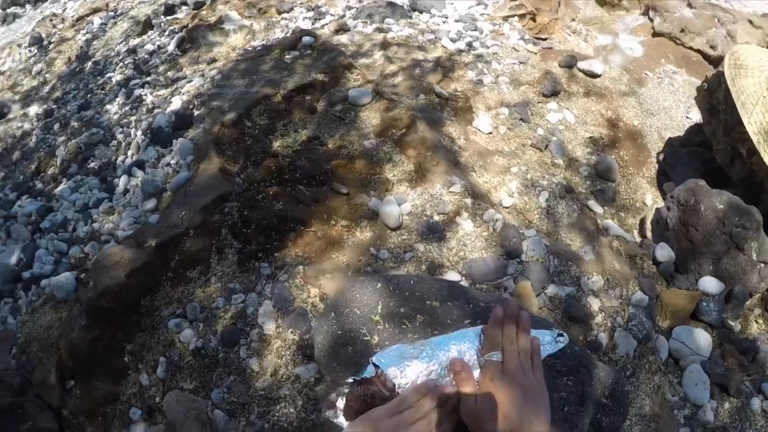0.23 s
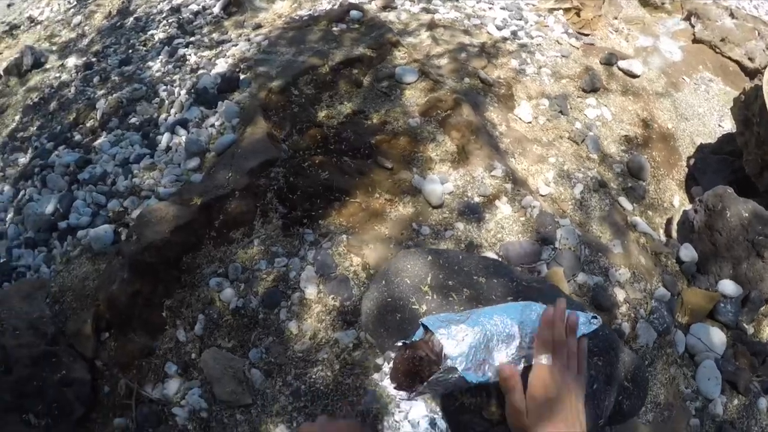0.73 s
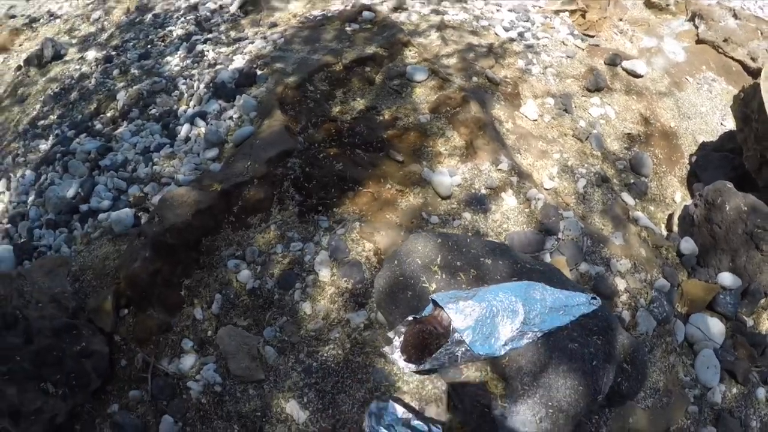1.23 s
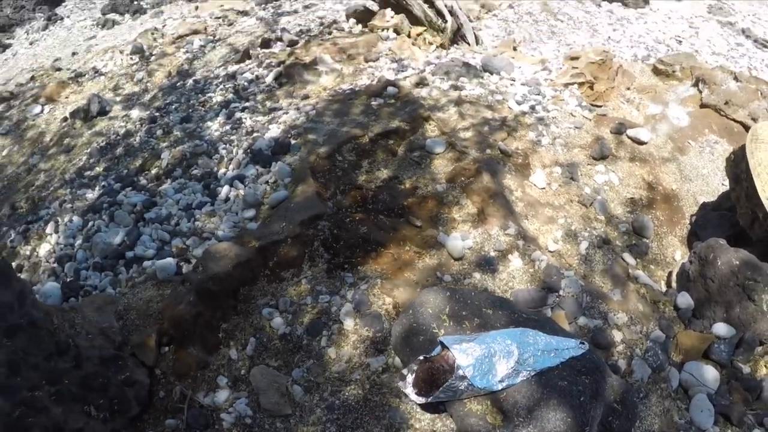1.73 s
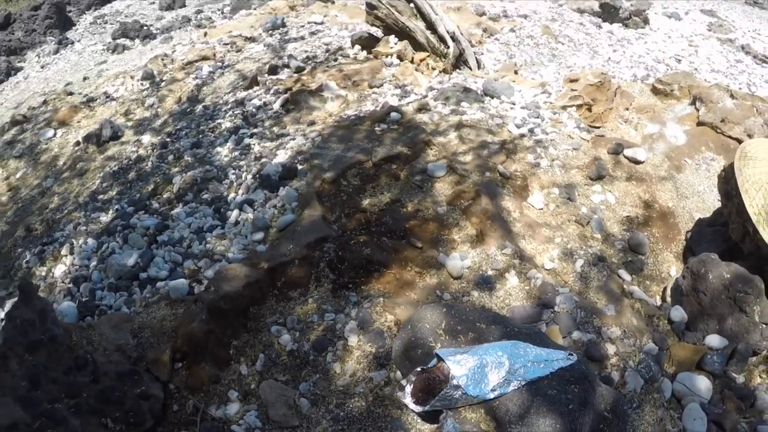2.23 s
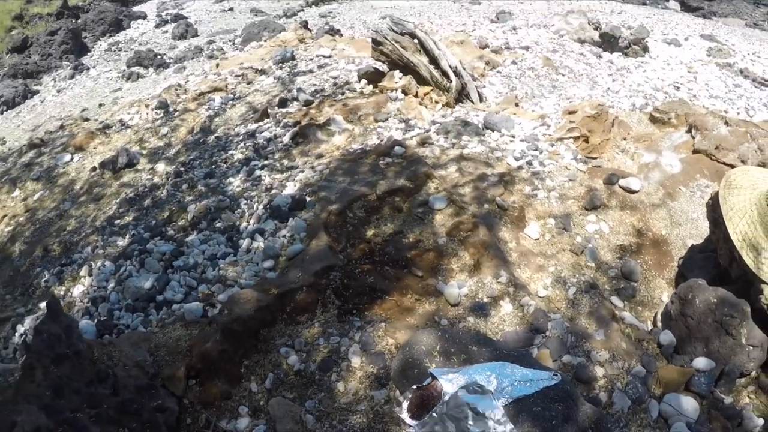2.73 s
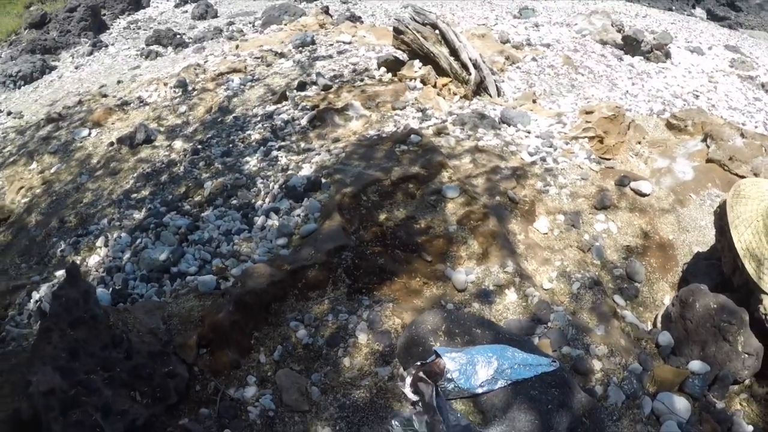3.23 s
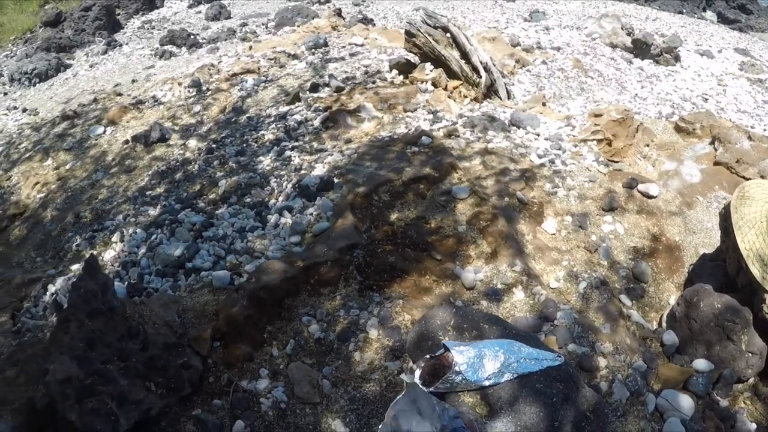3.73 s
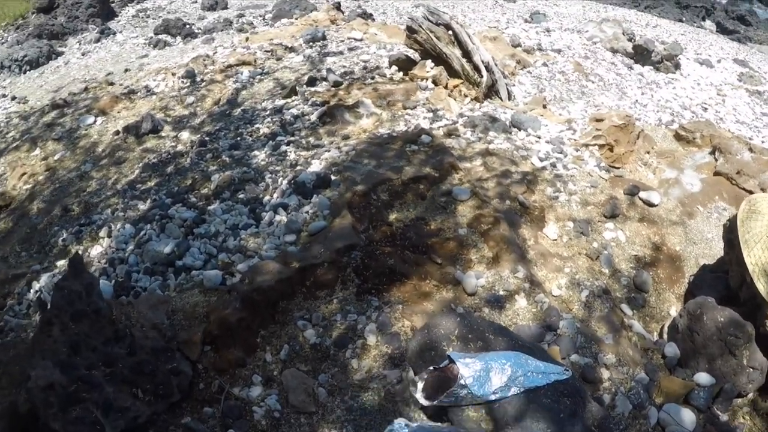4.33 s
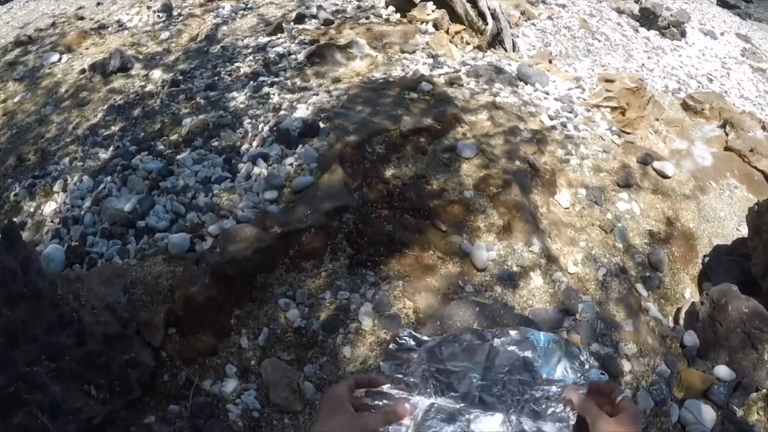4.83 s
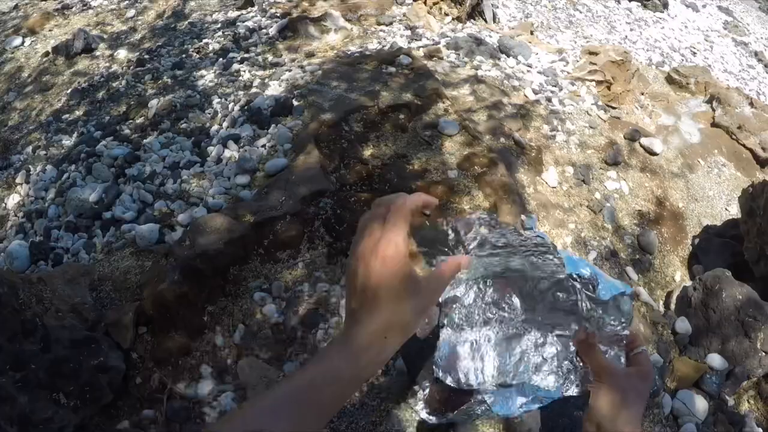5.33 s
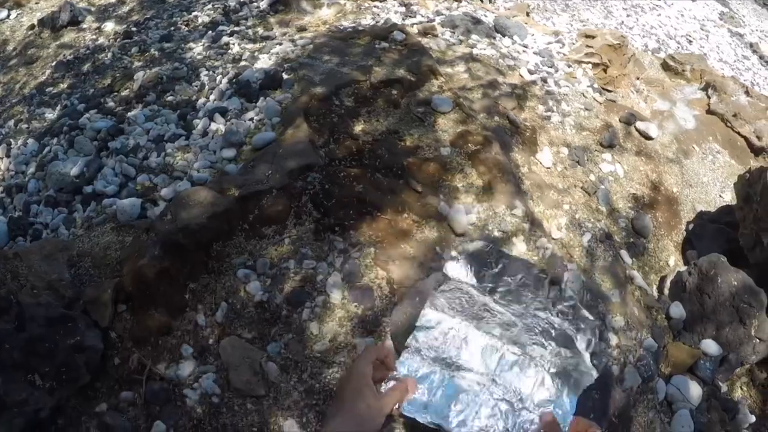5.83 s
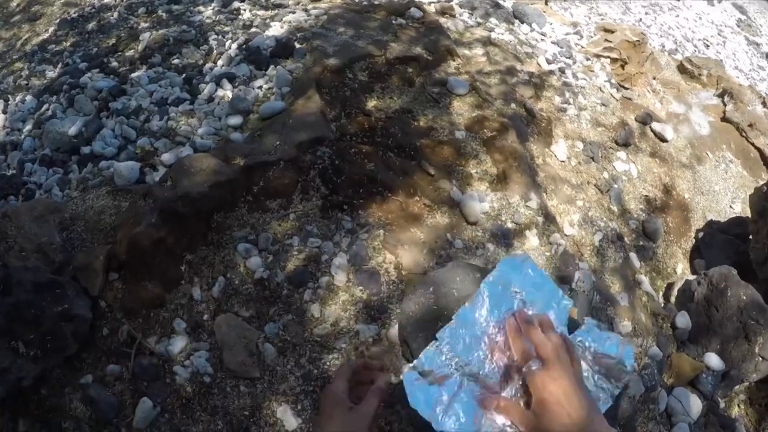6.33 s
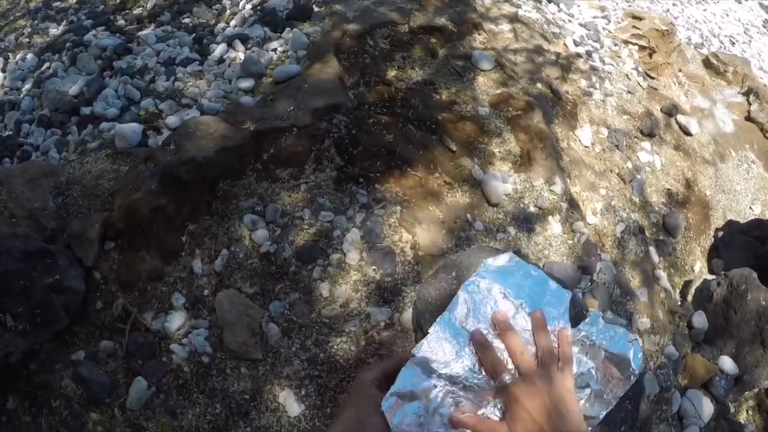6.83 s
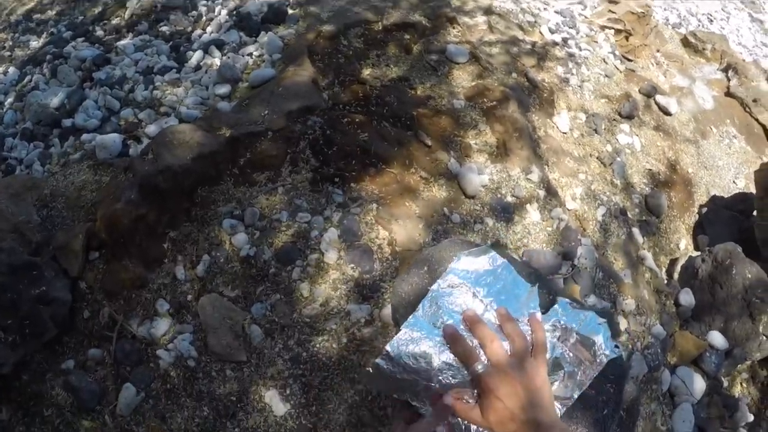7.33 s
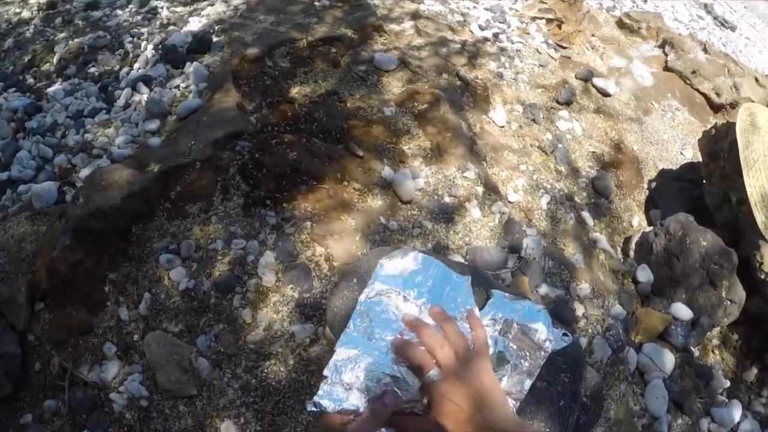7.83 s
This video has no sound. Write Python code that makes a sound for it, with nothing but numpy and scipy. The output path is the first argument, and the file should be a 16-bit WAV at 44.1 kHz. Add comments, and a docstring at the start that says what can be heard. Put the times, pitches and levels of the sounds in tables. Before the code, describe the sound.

Hands crinkle crisp foil outdoors by the shore, sharp crackles over soft water hiss and wind puffs, then a loud knock and small tick.

```python
"""Thin foil rustles, crackles and snaps close by, with one hard knock and then a bright tick to the left.
Place: a stony shore. Far sea hiss is coloured noise; wind is gusty noise and blunt pushes on two ports.
Near the microphones, hands fold and press the foil: random facets pop and ring, clustered around creases.
The microphone is a small camera's pair of ports, whose housing colours each side differently."""
import sys
import numpy as np
from scipy import signal
from scipy.fft import rfft, irfft, next_fast_len
from scipy.io import wavfile

SR = 44100
rng = np.random.default_rng(int(sys.argv[2]) if len(sys.argv) > 2 else 0)


def digitize_waveform(pressure):
    """Quantize a signal to 16-bit integers and store it at the path in sys.argv[1].

    Rows of a 2-D input are taken as channels; values are limited to [-1, 1].
    """
    field = np.atleast_2d(pressure).T
    bounded = np.clip(field, -1, 1)
    quanta = np.round(bounded * 32767).astype(np.int16)
    wavfile.write(sys.argv[1], SR, quanta)


N = 356019   # samples

# Table levels are each layer's own drive, ahead of its trims, the ports and the output stage.
# Far water: (time [s], hiss level [dB])
SEA = [(0.0, -47), (0.87, -44.5), (2.0, -45), (2.62, -47.5), (2.99, -46), (3.23, -47.5), (4.16, -44),
       (4.56, -41.5), (5.08, -46.5), (5.64, -44), (5.8, -41.5), (6.18, -46), (6.85, -41.5), (7.17, -43.5),
       (7.3, -42.5), (7.75, -45), (7.87, -44), (8.07, -45)]
# Hiss spectrum: (frequency [Hz], relative density [dB per Hz])
SEA_COLOUR = [(150, 22), (500, 10), (1500, 9), (2000, 5), (2600, 5), (3600, 0), (4800, -5.5), (6500, -4),
              (12000, -5.5)]
# Deep rumble: (time [s], level [dB])
RUMBLE = [(0, -75), (1.3, -72), (3.5, -77), (4.2, -71), (7.0, -71), (7.6, -68), (7.76, -52), (7.95, -49),
          (8.07, -40)]
# Light air on the camera: (time [s], buffeting level [dB])
WIND = [(0, -58), (1.3, -56), (2.5, -49.5), (3.9, -50.5), (4.5, -55), (5.4, -52), (6.3, -47), (6.7, -48),
        (7.3, -45), (7.74, -45), (7.95, -38.5), (8.07, -39)]
# Buffeting spectrum: (frequency [Hz], relative density [dB per Hz])
WIND_COLOUR = [(160, 1.5), (210, -4.5), (350, -11.5), (600, -42), (1200, -29), (4000, -79)]
# Gusts at the ports: (time [s], peak level [dB], half-length of window [s], left minus right [dB])
GUSTS = [(.01, -41, 0.079, 0), (1.236, -48, 0.2, 14), (1.48, -39, 0.11, 14), (1.672, -42.5, 0.31, 17),
         (1.783, -51, 0.1, 12), (1.918, -45, 0.072, 7), (2.54, -38, 0.061, 5), (2.918, -51, .15, 2),
         (3.112, -48.5, 0.14, 17), (4.14, -45, 0.13, 18), (4.255, -43, 0.093, 0), (4.613, -36.5, 0.18, -3),
         (5, -47, 0.11, 12), (5.226, -39.5, 0.16, 4), (5.667, -40.5, 0.059, 10), (5.882, -43, 0.11, 17),
         (5.979, -41, 0.043, 23), (6.058, -35, 0.068, 12), (6.24, -42, 0.13, 2), (6.349, -34, 0.036, 8),
         (6.771, -35, 0.059, 9), (6.933, -37.5, 0.23, 12.5), (7.22, -42, 0.23, 13), (7.302, -41, 0.21, 11),
         (7.491, -39.5, 0.16, 28), (7.547, -28, 0.049, 17), (7.588, -25.5, 0.053, 16),
         (7.636, -29.5, 0.13, 9)]
# Puffs pushing mostly on the left port: (time [s], peak level [dB], width [s], left minus right [dB])
THUMPS = [(1.5074, -20, 0.00096, 16), (1.675, -32, .0012, 16), (4.1585, -13, 0.00099, 14),
          (5.9767, -29, 0.00062, 18), (6.0668, -18, 0.0014, 18), (6.36, -16, 0.0011, 19),
          (6.7804, -18, 0.0022, 16), (6.892, -30, .0007, 8), (6.9383, -22, 0.00051, 10),
          (7.218, -34, .0012, 16), (7.2823, -15, 0.00089, 17), (7.359, -28, .0008, 9),
          (7.393, -19, .0012, 14), (7.4935, -19, .001, 16), (7.5316, -17, 0.0017, 17),
          (7.542, -5.5, 0.00097, 16), (7.5763, -15, 0.00046, 14), (7.5795, -4, 0.0018, 16),
          (7.601, -18, .0009, 14)]
# Modes the knock rings: (frequency [Hz], level [dB], decay by 60 dB [s], left minus right [dB])
KNOCK_MODES = [(190, -4.5, 0.013, -1), (400, -1, 0.0051, 13), (1110, -8, 0.0076, 18),
               (1850, 0.5, 0.0033, 13), (3250, -7.5, 0.0073, 14), (3770, -5, 0.0039, 4),
               (5350, -22, 0.0036, -9), (6900, -29, 0.004, 5), (8600, -23, 0.0078, -2)]
# Handling of the sheet: (time [s], crackle level [dB], dull flexing relative to crackle [dB])
HANDLING = [(0, -52.5, 3.5), (.6, -48, 1), (.72, -50, -2), (.97, -49.5, 6), (1.04, -42, -1.5),
            (1.13, -44.5, -1.5), (1.3, -41.5, -6.5), (1.58, -55, 7.5), (1.98, -42, -12), (2.05, -59, 4.5),
            (2.4, -48.5, 1), (2.65, -52, 6), (2.95, -47.5, -1), (3.37, -58.5, 11), (3.6, -46, 1),
            (4.0, -57, 10.5), (4.64, -54, 6), (4.69, -40, -3.5), (4.75, -50, 5), (5.3, -43, -2.5),
            (5.6, -59.5, 7.5), (5.86, -55, 5), (5.95, -38, -10), (6.0, -54.5, 2.5), (6.33, -49, 3),
            (6.39, -38.5, -5.5), (6.56, -49, 0), (6.71, -37, -25), (6.93, -38, 4.5), (7.04, -44.5, -17),
            (7.16, -37.5, -5), (7.23, -49.5, -1), (7.28, -54, 3), (7.35, -50.5, 14), (7.4, -46, 2),
            (7.66, -47, -2), (7.73, -54, -5), (7.8, -41, -24), (7.92, -47.5, 8), (8.02, -53, -3),
            (8.07, -41, 0)]
# Facet pitches: (frequency [Hz], relative level [dB])
FOIL_COLOUR = [(400, -9), (1000, 0.5), (2500, 3.5), (5000, 2), (8000, 4), (14000, 15.5)]
# Larger panels that buckle: (time [s], peak level [dB], ringing frequency [Hz])
CRUMPLES = [(0.1, -27, 1230), (0.3, -30.5, 1370), (0.387, -27, 940), (0.626, -28, 850), (1.018, -28, 448),
            (1.456, -33, 1680), (1.462, -26, 1670), (2.197, -27, 670), (2.283, -25.5, 740),
            (2.358, -36, 2030), (2.756, -38, 2020), (2.771, -31, 1950), (2.844, -31, 1150),
            (2.871, -31, 1910), (2.874, -34, 810), (2.933, -32, 1200), (2.952, -32, 1900),
            (3.52, -33, 1190), (4.335, -27, 719), (4.354, -30, 719), (4.54, -28, 1780), (4.752, -24, 1250),
            (5.271, -28, 1890), (5.662, -23, 760), (5.827, -24, 1900), (5.937, -26.5, 1500),
            (5.948, -19, 1140), (5.956, -20, 1820), (6.231, -38, 974), (6.854, -20, 877), (6.891, -18, 450),
            (7.1, -27, 485), (7.158, -21.5, 474), (7.187, -18.5, 1040), (7.27, -18.5, 608),
            (7.282, -21.5, 770), (7.31, -28, 1470), (7.339, -27, 1210), (7.346, -28, 805),
            (7.358, -23, 751), (7.408, -32, 1900), (7.438, -27, 764), (7.572, -19, 550), (7.767, -32, 934),
            (7.842, -37, 1840), (7.909, -35, 1070), (7.928, -24, 1090)]
# Single dry cracks: (time [s], peak level [dB], centre frequency [Hz])
CRACKS = [(0.1371, -25, 3010), (0.2481, -30, 6290), (0.398, -27, 5810), (0.4143, -27, 4780),
          (0.4267, -28, 5080), (0.4309, -30, 6240), (0.6296, -19, 6500), (0.6403, -25, 7840),
          (0.6671, -29, 7240), (1.1677, -29, 6630), (1.2611, -26, 6330), (1.3066, -25, 6160),
          (1.3388, -23, 6070), (1.3803, -25, 6630), (1.8403, -24, 6240), (1.8552, -23, 6160),
          (1.9318, -22, 6500), (1.9527, -26, 7450), (2.1163, -26, 6240), (2.2006, -17, 2970),
          (2.2059, -27, 2500), (2.3473, -28, 5990), (2.361, -27, 6720), (2.3837, -27, 6590),
          (2.4076, -30, 5860), (2.4278, -24, 6330), (2.4632, -28, 6590), (2.5321, -20, 6290),
          (2.7586, -21, 6330), (2.7961, -31, 6160), (2.873, -16, 4220), (2.8911, -24, 6030),
          (3.0396, -31, 5990), (3.1213, -25, 6160), (3.2347, -30, 7020), (3.261, -28, 6630),
          (3.4739, -27, 6290), (3.5181, -20, 5940), (3.5238, -24, 6890), (3.5454, -28, 6030),
          (3.66, -27, 7110), (3.77, -26, 6070), (4.0176, -20, 6500), (4.0671, -25, 5990),
          (4.0726, -24, 5900), (4.1001, -21, 5810), (4.149, -24, 6290), (4.1583, -22, 6030),
          (4.1674, -23, 5640), (4.2123, -27, 7540), (4.3554, -26, 2110), (4.5428, -19, 1850),
          (4.6801, -26, 6800), (4.9673, -24, 6630), (5.0252, -21, 5990), (5.0574, -19, 5560),
          (5.0613, -25, 5170), (5.1884, -23, 5340), (5.1987, -22, 5770), (5.2154, -24, 4870),
          (5.2555, -27, 1940), (5.2884, -24, 3660), (5.3095, -25, 5990), (5.3597, -27, 7110),
          (5.3764, -21, 6030), (5.6063, -31, 6630), (5.6375, -26, 5510), (5.6681, -17, 5640),
          (5.6737, -19, 6240), (5.7563, -27, 7110), (5.791, -23, 5990), (5.8052, -24, 5040),
          (5.8288, -22, 1810), (5.8466, -25, 5900), (5.945, -23, 6120), (6.231, -24, 6720),
          (6.2358, -25, 6160), (6.2465, -29, 6760), (6.3705, -22, 3490), (6.5495, -29, 6930),
          (6.6906, -25, 6850), (6.7891, -20, 6330), (6.8499, -23, 6500), (6.8673, -25, 6200),
          (6.9049, -18, 5380), (6.9171, -23, 5170), (6.9317, -22, 5860), (6.9684, -25, 6200),
          (7.022, -27, 6160), (7.0582, -24, 6630), (7.1041, -23, 5770), (7.1429, -20, 3920),
          (7.1595, -14, 5680), (7.1645, -25, 5430), (7.1887, -22, 1680), (7.1934, -22, 5340),
          (7.2315, -30, 6890), (7.2584, -22, 5600), (7.3405, -25, 7110), (7.4394, -25, 5080),
          (7.4469, -24, 7190), (7.5454, -26, 6460), (7.5774, -23, 5560), (7.6087, -26, 3190),
          (7.6175, -17, 2710), (7.768, -25, 5860), (7.8409, -23, 5770), (7.904, -21, 6500),
          (7.9107, -22, 6500)]
# Creases that snap: (time [s], peak level [dB], relative dull part [dB], ringing frequency [Hz],
# relative swell of rustle [dB])
SNAPS = [(0.1248, -27.5, -4.5, 5800, -10.5), (0.2382, -41, -15, 6300, -0.5),
         (0.397, -27.5, -9, 5640, -14.5), (0.5621, -25, -21, 6470, -22), (0.6262, -15, -14, 6700, -36),
         (0.632, -14.5, -10, 6700, -23), (0.786, -29, -13, 6470, -15), (1.046, -35, -20, 6300, -16),
         (1.105, -24.5, -20, 6070, -18), (1.257, -26.5, -0.5, 6300, -9.5), (1.3056, -28, -18, 6030, -26),
         (1.3367, -23, -11, 6000, -31), (1.378, -22, -32, 6700, -31), (1.659, -28, 2, 6200, -13),
         (1.742, -31, -3, 6590, -16), (1.8393, -18.5, -25, 6200, -34), (1.93, -24.5, -23, 6530, -14.5),
         (2.0024, -17.5, -10, 3900, -18), (2.1136, -28.5, -9, 6200, -11), (2.167, -30.5, -20, 6600, -7.5),
         (2.1998, -10, -17, 2580, -31), (2.2018, -18.5, -26, 6450, -30), (2.2855, -24, -12, 2860, -21),
         (2.346, -26.5, -3, 6960, -13.5), (2.383, -30, -20, 7050, -16), (2.427, -28.5, -27, 6340, -14.5),
         (2.5306, -17.5, -17, 6200, -21.5), (2.7558, -20, -19, 6330, -11), (2.763, -22, -16, 6700, -24),
         (2.7696, -22, -20, 3620, -26), (2.842, -23, -12, 3080, -22), (2.871, -20.5, -2, 4040, -17),
         (2.891, -24, -12, 6900, -20), (2.93, -28, -9, 6900, -21), (2.95, -27, -16, 4120, -12),
         (3.04, -29, -16, 6270, -14), (3.1194, -22, -29, 6450, -33), (3.231, -24.5, -14, 6300, -20),
         (3.2584, -23.5, -6, 6900, -22), (3.417, -28.5, -6, 6660, -9.5), (3.471, -32.5, -24, 5960, -7.5),
         (3.5176, -21.5, -10, 6300, -14), (3.657, -28, -12, 7040, -23), (3.7693, -29, -18, 6300, -29),
         (3.904, -31.5, -22, 3070, -9), (4.014, -15.5, -24, 6600, -34), (4.065, -22, -21, 5910, -34),
         (4.072, -27, -16, 5200, -31), (4.099, -20.5, -19, 5860, -20), (4.147, -22, -20, 6550, -19),
         (4.1533, -19, -20, 6000, -17), (4.165, -17, -26, 5700, -26), (4.214, -28.5, -10, 6050, -11),
         (4.354, -27.5, -5, 2360, -14), (4.465, -26.5, -22, 6400, -8.5), (4.5409, -13, -18, 3250, -24.5),
         (4.6794, -24, -17, 6840, -20), (4.966, -26, -11, 6100, -26), (5.023, -23, -15, 6000, -32),
         (5.0549, -16.5, -25, 5330, -19), (5.185, -26, -2, 5350, -29), (5.199, -23, -4, 6330, -14),
         (5.288, -21, -22, 3630, -13), (5.3743, -16, -30, 6200, -34), (5.6046, -29, -18, 3280, -18),
         (5.6366, -21, -8, 6360, -22), (5.6636, -14.5, -7, 2800, -33), (5.668, -13, -15, 5430, -20),
         (5.7547, -22, -22, 4700, -34), (5.79, -23.5, -19, 5840, -16), (5.8463, -29.5, -5, 4870, -7.5),
         (6.153, -23.5, -2.5, 3620, -18), (6.231, -24.5, -0.5, 6700, -13), (6.3694, -18, -18, 3670, -23),
         (6.715, -24, -10, 6300, -16), (6.745, -26, -16, 6450, -12), (6.768, -28.5, -9, 6650, -0.5),
         (6.7857, -31, -18, 6800, -21), (6.81, -45, -20, 6300, -27), (6.83, -38, -20, 6560, -26),
         (6.8544, -26, 2, 6900, -19), (6.9042, -22, -22, 5800, -21), (6.929, -23.5, -12, 6270, -13),
         (6.9654, -24, -17, 6130, -20), (7.0569, -30, -24, 6460, -15), (7.102, -23, -9, 5600, -18),
         (7.1447, -19.5, -13, 6040, -11.5), (7.157, -19, -25, 5770, -20), (7.187, -22, -8, 5400, -18),
         (7.256, -21, -25, 6000, -20), (7.285, -22.5, -11, 3680, -19), (7.3397, -19, -9, 2340, -29),
         (7.441, -22, -24, 5970, -19), (7.449, -22, -17, 6900, -25), (7.5438, -26, -7, 6340, -12),
         (7.5766, -22, -14, 6270, -19), (7.6163, -10.5, -20, 2620, -31), (7.685, -26, 4, 7150, -10),
         (7.7682, -17.5, -2.5, 5620, -25), (7.788, -23, -4, 3960, -10.5), (7.8385, -24.5, 4, 2430, -12.5),
         (7.8822, -20, -18, 6560, -22), (7.9017, -25, -20, 6690, -26), (7.9098, -16.5, -5.5, 6300, -36),
         (7.936, -28, -15, 6500, -11), (8.0414, -25, -16, 5770, -16)]
# Microphone ports: (frequency [Hz], left level [dB], right level [dB], nominal phase lead of right [rad],
# nominal likeness of the sides [0-1])
PORTS = [(443, -7.5, -11, 1.93, 0.14), (688, -3.5, -9.5, 3, 0.54), (1090, -7.5, -1.5, 2.5, 0.79),
         (1250, -8, -5.5, 1.26, 0.45), (1640, -15, -0.5, 5, 0.2), (1694, -6.5, -4.5, 0.04, 0.93),
         (1950, -4, -5, 1.13, 1), (2210, -10, -6, 1.5, 0.8), (3620, -5.5, -2, 0.59, 0.98),
         (4400, -2, -4.5, 0.5, 0.85), (5300, -3, 0.5, 1.83, 0.9), (5550, 3.5, -1.5, 0.95, 0.6),
         (6200, 4, 4, 1.0, 0.7), (7650, 1.5, 0, 0.5, 0.15), (8940, -11.5, -3.5, 7.5, 0),
         (10100, -11.5, -12.5, -8.5, 0.1), (10570, -24, -19, -5.5, 0.5), (13130, -17.5, -20, -2, 0.96),
         (15100, -48, -33, -43, .8)]

KNOCK_S, KNOCK_DB = 7.668, -0.5
TICK_S, TICK_DB, TICK_T60_S = 7.7879, -13.5, 0.0051
TICK_LEAD_S = .00007   # head start at the left port
DULL_BELOW_HZ = 2400   # facets above this count as bright
DULL_LAG = 0.69   # dB the dull flexing loses, relative to the crackle, per dB of swell
SWELL_RISE_S, SWELL_FALL_S = .002, 0.011   # rustle gathers before a snap and drops after it
BUILD_UP_S = 0.001012   # a panel starts this long before its reference time
CRUMPLE_T60_S = 0.077
CRUMPLE_OVERTONE, CRUMPLE_OVERTONE_DB = 1.62, -12.5   # second mode: multiple of the first, relative level
CRACK_CYCLES = 7.0   # cycles of the main pulse until 60 dB down
CRACK_LAG_S = .00002   # the left port hears a crack this much later
SNAP_T60_S, SNAP_T60_SPREAD = 0.027, 0.34   # median decay, spread of its natural log
BROAD_DB = -9   # bright facets joining each snap, relative to its envelope
NEAR_RATIO = 1.54   # band edges of the near pops, either side of the panel's pitch
# Lesser snaps: strongest peak over the crackle, middle dull part, base ringing frequency
SMALL_SNAP_DB, SMALL_DULL_DB, SMALL_HZ = 18, -29, 6300
SOFT_ABOVE_HZ = 9500   # contacts are not perfectly hard
WIND_CUT_HZ = 146.4
TOP_STOP_HZ = 16300   # from here up the top is fully cut


def from_db(db):
    """Decibels to amplitude gain."""
    return 10 ** (np.asarray(db) / 20)


def rms_one(x):
    """Scale to unit rms."""
    return x / np.sqrt(np.mean(x ** 2) + 1e-20)


def in_time(rows):
    """Value columns of a time table, read at every sample."""
    s, *columns = np.transpose(np.vstack(rows))
    return [np.interp(np.arange(N) / SR, s, c) for c in columns]


def at_hz(points, hz, column=1):
    """Read a table column on a log-frequency axis."""
    points = np.array(points)
    return np.interp(np.log(hz), np.log(points[:, 0]), points[:, column])


def coloured(x, response):
    """Filter by a function of frequency."""
    size = next_fast_len(N + 4096)
    hz = np.maximum(np.arange(size // 2 + 1) * SR / size, 1)
    return irfft(rfft(x, size) * response(hz), size)[..., :N]


def drift(rate_hz, count=1):
    """Slow chance: noise through a double one-pole low-pass, scaled to unit rms."""
    r = np.exp(-2 * np.pi * rate_hz / SR)
    noise = rng.standard_normal((count, N + 9000))
    return rms_one(signal.lfilter([1], [1, -2 * r, r * r], noise)[:, 9000:])   # skip the filter's start


def ring(clicks, hz, t60):
    """Two-pole resonance: a unit click sets off a decaying sine of starting height 1."""
    r, w = from_db(-60 / (t60 * SR)), 2 * np.pi * hz / SR
    return signal.lfilter([0, np.sin(w)], [1, -2 * r * np.cos(w), r * r], clicks + 1e-18)


def delayed(x, lag_s):
    """Arrive a little late, read between samples."""
    return np.interp(np.arange(len(x)) - lag_s * SR, np.arange(len(x)), x)


def soften(x):
    """Low-pass the hard edge of a click."""
    return signal.sosfilt(signal.butter(4, SOFT_ABOVE_HZ, fs=SR, output="sos"), x)


def avalanche(peak_db, t60, rise_s):
    """Envelope that rises quickly and dies away exponentially."""
    t = np.arange(int(.2 * SR)) / SR
    return from_db(peak_db - 60 * t / max(t60, .004)) * (1 - np.exp(-t / rise_s))


def sea():
    """Far water: smooth broadband noise whose level swells a little."""
    noise = rng.standard_normal((2, N))
    hiss = coloured(noise, lambda hz: from_db(at_hz(SEA_COLOUR, hz)) * (hz > 100))
    return rms_one(hiss) * from_db(in_time(SEA)[0] + 10.5 + 0.6 * drift(1.19)[0])


def rumble():
    """Deep band of noise; a shared part and a weaker part per side make the sides nearly alike."""
    noise = rng.standard_normal((3, N))
    deep = signal.sosfilt(signal.butter(1, [26, 52], "band", fs=SR, output="sos"), noise)
    deep = signal.sosfilt(signal.butter(2, 90, fs=SR, output="sos"), deep)
    return rms_one(deep[0] + 0.55 * deep[1:]) * from_db(in_time(RUMBLE)[0])


def wind():
    """Buffeting: lumpy low noise, separate at each port; gusts add power, mostly on one side."""
    power = from_db(in_time(WIND)[0]) ** 2 * np.ones((2, 1))
    for s, peak_db, length, pan_db in GUSTS:
        swell = np.hanning(round(2 * length * SR)) ** 4
        i = round((s - length) * SR)
        side_db = peak_db + np.array([[.5], [-.5]]) * pan_db
        power[:, max(i, 0):i + len(swell)] += from_db(side_db) ** 2 * swell[max(-i, 0):]
    lumpy = rng.standard_normal((2, N)) * from_db(2.2 * drift(17.0, count=2))
    air = coloured(lumpy, lambda hz: from_db(at_hz(WIND_COLOUR, hz)))
    return rms_one(air) * np.sqrt(power) * from_db(2.5)


def thumps():
    """Each puff of air is one smooth pressure bump, weaker and inverted at the right port."""
    out, t = np.zeros((2, N)), np.arange(-400, 400) / SR
    for s, peak_db, width, pan_db in THUMPS:
        i = round(s * SR)
        height = from_db(peak_db - np.array([[0], [pan_db]])) * [[1], [-1]]
        out[:, i - 400:i + 400] += height * np.exp(-.5 * (t / width) ** 2)
    return out


def knock():
    """One hard blow close by: quick contacts, then briefly rattling grit, ring the same modes."""
    hits = np.zeros(N)
    for delay_s, size in [(.0001, -0.13), (.0005, -1.42), (.0009, 0.71)]:
        hits[round((KNOCK_S + delay_s) * SR)] = size
    rattle = avalanche(-27.0, 0.018, rise_s=0.00034)
    start = round(KNOCK_S * SR)
    hits[start:start + len(rattle)] += rattle * rng.standard_normal(len(rattle))
    hits = soften(hits)
    out = np.zeros((2, N))
    for hz, db, t60, pan_db in KNOCK_MODES:
        out += from_db(KNOCK_DB + db - np.array([[0], [pan_db]])) * ring(hits, hz, t60)
    return out


def tick():
    """A few quick contacts ring short, mostly bright modes, reaching the left port first."""
    hits = np.zeros(N)
    for delay_s, size in [(0, -1.3), (.0004, -0.084), (.0008, -.8)]:
        hits[round((TICK_S + delay_s) * SR)] = size
    modes = [(1200, -28), (3900, -10), (6900, 1), (8600, 2)]   # (frequency [Hz], level [dB])
    rung = sum(from_db(TICK_DB + db) * ring(hits, hz, TICK_T60_S) for hz, db in modes)
    return np.array([rung, delayed(rung, TICK_LEAD_S)])


def facets(per_s, spread_db, cycles, patchy_db):
    """Facets pop at random and ring briefly, each size coming and going; dull and bright, two paths each."""
    born = rng.random((2, N)) < per_s / SR
    strength = from_db(spread_db * np.minimum(rng.exponential(1, (2, N)), 4))
    pops = born * strength * rng.choice([-1, 1], (2, N))
    pitches = np.geomspace(450, 14000, 14)
    dealt = rng.integers(0, 14, (2, N))   # which pitch each pop gets
    patches = from_db(patchy_db * drift(15.6, count=14))
    out = np.zeros((2, 2, N))
    for k, hz in enumerate(pitches):
        rung = ring(pops * (dealt == k), hz, cycles / hz)
        out[int(hz > DULL_BELOW_HZ)] += from_db(at_hz(FOIL_COLOUR, hz)) * patches[k] * rung
    return rms_one(out[0]), rms_one(out[1])


def rustle():
    """The handled sheet crackles in clumps of facet pops, swelling around each crease that snaps."""
    kicks = np.zeros(N)
    for s, peak_db, *_, swell_db in SNAPS:
        kicks[round(s * SR)] = from_db(peak_db + swell_db) ** 2

    def smear(power, tau):
        """One-pole exponential tail."""
        return signal.lfilter([1], [1, -np.exp(-1 / (tau * SR))], power + 1e-18)
    rise = smear(kicks[::-1], SWELL_RISE_S)[::-1]   # run backwards, so it leads the snap
    fall = smear(kicks, SWELL_FALL_S)
    bed_db, dull_db = in_time(HANDLING)
    crackle_db = 10 * np.log10(from_db(bed_db) ** 2 + rise + fall)
    dull, bright = facets(per_s=5000, spread_db=3.5, cycles=6.0, patchy_db=2.5)
    clumps = from_db(crackle_db + 1.67 * drift(19.3)[0])
    dull_gain = from_db(dull_db - DULL_LAG * (crackle_db - bed_db))
    return clumps * (bright + dull_gain * dull)


def panel(s, shape, hz, per_s, cycles, first):
    """A firm first pop, then uneven ones under the envelope, ring the panel at its own pitch."""
    draw = rng.random((2, len(shape)))
    pops = (draw < per_s / SR) * rng.normal(0, 1, draw.shape)
    pops[:, round(BUILD_UP_S * SR / 2)] = first
    steady = np.sqrt(per_s * cycles / hz / (2 * np.log(1000)))   # scale of overlapping rings
    i = round((s - BUILD_UP_S) * SR)
    return i, (ring(pops * shape, hz, cycles / hz) / steady)[:, :N - i]


def crumples():
    """Larger panels buckle in rough steps, ringing two brief hollow modes."""
    out = np.zeros((2, N))
    for s, peak_db, hz in CRUMPLES:
        for ratio, mode_db in [(1, 0), (CRUMPLE_OVERTONE, CRUMPLE_OVERTONE_DB)]:
            shape = avalanche(peak_db + mode_db - 7.5, CRUMPLE_T60_S, rise_s=0.00075)
            i, rung = panel(s, shape, hz * ratio, per_s=1200, cycles=10.0, first=3.5)
            out[:, i:i + rung.shape[1]] += rung
    return out


def cracks():
    """A stiff crease gives way in one step: a very short pulse at its own pitch, straight to both ports."""
    out, step = np.zeros(N + 400), np.eye(1, 400)[0]
    edge = from_db(-11.5) * ring(step, hz=8500, t60=0.00074)
    body = from_db(-13.5) * ring(step, hz=2740, t60=0.0012)
    for s, peak_db, hz in CRACKS:
        pulse = ring(step, hz, CRACK_CYCLES / hz) + edge + body
        i = round(s * SR)
        out[i:i + len(step)] -= from_db(peak_db) * pulse
    return from_db(-0.5) * np.array([delayed(out, CRACK_LAG_S), out])[:, :N]


def small_snaps(count):
    """Rows for lesser snaps at random times, their strength following the handling."""
    crackle_db = in_time(HANDLING)[0]
    rows = []
    for when, weaker, dullness, pitch in rng.random((count, 4)):
        s = 0.0059 + when * (N / SR - .02)
        peak_db = crackle_db[int(when * N)] + SMALL_SNAP_DB - 8 * weaker
        dull_db = SMALL_DULL_DB + 14 * (dullness - .5)
        rows.append((s, peak_db, dull_db, SMALL_HZ * (0.98 + 0.29 * pitch)))
    return rows


def snaps():
    """Each snap is a short avalanche: a ringing panel, pops near its pitch, and facets of all sizes."""
    dull, bright = facets(per_s=14000, spread_db=4.0, cycles=8.0, patchy_db=3.0)
    bright_env, dull_env = np.zeros((2, N))
    out = np.zeros((2, N))
    for s, peak_db, dull_db, hz, *_ in list(SNAPS) + small_snaps(count=30):
        s = s + BUILD_UP_S   # so the panel starts at the listed time
        t60 = SNAP_T60_S * np.exp(SNAP_T60_SPREAD * rng.standard_normal())
        shape = avalanche(peak_db - 9.5, t60, rise_s=0.00087)
        i, rung = panel(s, shape * from_db(-8.0), hz, per_s=2600, cycles=50.0, first=0.74)
        _, near = panel(s, shape * from_db(-3.0), hz, per_s=9000, cycles=1.1, first=1.1)
        band = [hz / NEAR_RATIO, hz * NEAR_RATIO]
        near = signal.sosfilt(signal.butter(2, band, "band", fs=SR, output="sos"), near)
        span = slice(i, i + rung.shape[1])
        out[:, span] += rung + near
        bright_env[span] += shape[:N - i] * from_db(BROAD_DB)
        dull_env[span] += shape[:N - i] * from_db(dull_db + 5.5)
    return out + bright_env * bright + dull_env * dull


def ports(paths):
    """Two paths are shared out by likeness; each port adds its colour and its share of the phase."""
    def port(side):   # negative is left, positive is right
        def response(hz):
            alike = np.clip(at_hz(PORTS, hz, column=4), 0, 1)
            turn = np.exp(.5j * side * at_hz(PORTS, hz, column=3))
            mix = np.array([np.sqrt((1 + alike) / 2), side * np.sqrt((1 - alike) / 2)])
            return mix * turn * from_db(at_hz(PORTS, hz, column=1 + (side > 0)))
        return coloured(paths, response).sum(axis=0)
    return np.array([port(-0.98), port(0.89)])


def scene():
    """All sources at the microphone through a steep wind filter; the rumble joins after it."""
    foil = from_db(6.5) * (rustle() + snaps() + crumples())
    heard = ports(foil + sea()) + soften(cracks() + tick()) + wind() + thumps() + knock()
    wind_filter = signal.cheby1(6, 1.5, WIND_CUT_HZ, "high", fs=SR, output="sos")
    return signal.sosfilt(wind_filter, heard) + rumble()


def record(dry):
    """Gain control ducks after a loud peak and lets go; peaks are rounded, the top is cut."""
    level_db = 20 * np.log10(np.abs(dry).max(axis=0) + 1e-9)
    fall_db = 90 * np.arange(N) / SR   # held peak releases at 90 dB per second
    held_db = np.maximum.accumulate(level_db + fall_db) - fall_db
    excess_db = np.maximum(held_db + 4.5, 0)
    duck_db = signal.lfilter([.004], [1, .004 - 1], 0.24 * excess_db)   # smoothed onset and release
    wet = 1.6 * np.tanh(dry * from_db(-duck_db) / 1.6)
    return signal.sosfilt(signal.cheby2(16, 95, TOP_STOP_HZ, fs=SR, output="sos"), wet)


dry = scene()
out = record(dry)
digitize_waveform(out)
```